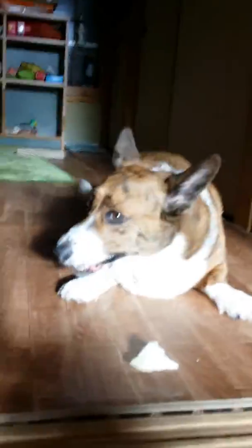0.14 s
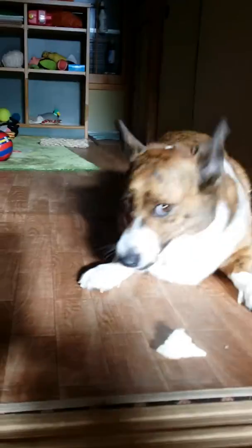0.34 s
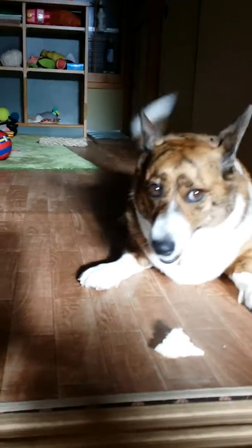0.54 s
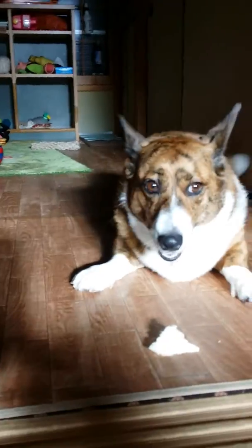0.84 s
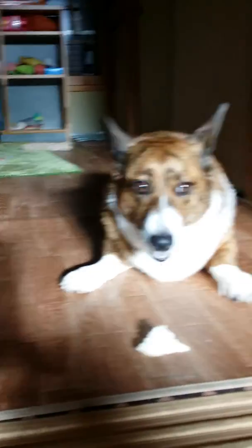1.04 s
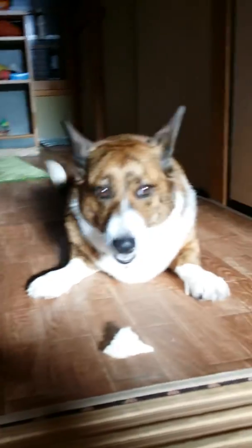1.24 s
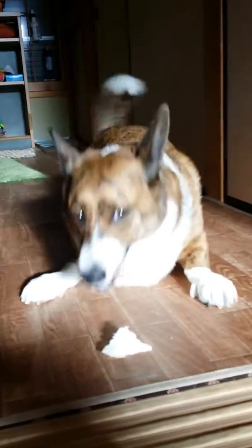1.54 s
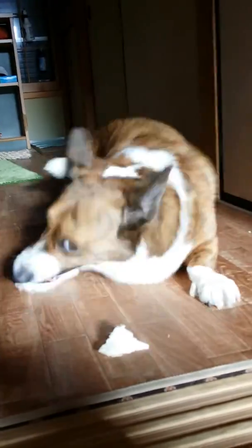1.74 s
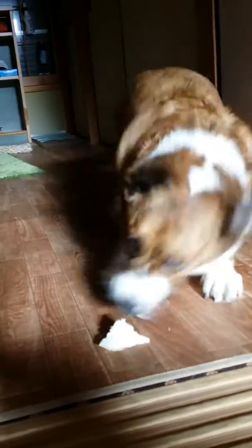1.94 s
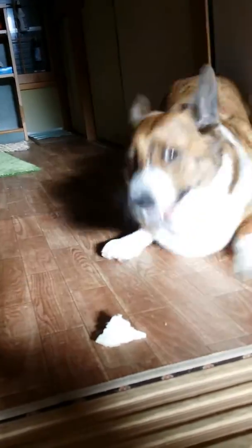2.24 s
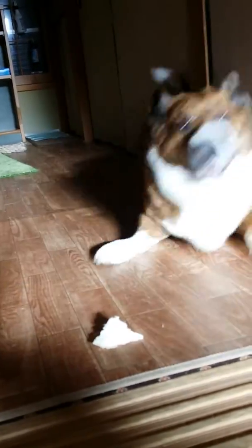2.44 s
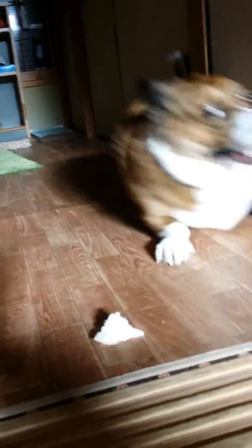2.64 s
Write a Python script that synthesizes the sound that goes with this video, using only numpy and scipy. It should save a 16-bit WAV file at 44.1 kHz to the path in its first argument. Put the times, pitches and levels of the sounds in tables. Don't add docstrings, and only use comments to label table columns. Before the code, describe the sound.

A dog gives two rough, throaty growls with pauses between, then a longer growl breaking into gulp, grunt and snarl; claws tick and paws thump on wooden boards in a small room, close phone microphone.

```python
import sys
import numpy as np
from scipy import signal
from scipy.fft import rfft, irfft, next_fast_len
from scipy.io import wavfile
from scipy.ndimage import uniform_filter1d, map_coordinates

SR = 44100
rng = np.random.default_rng(int(sys.argv[2]) if len(sys.argv) > 2 else 0)


def to_wav(s):
    ch = np.atleast_2d(s).T
    pcm = np.round(np.clip(ch, -1, 1) * 32767)
    wavfile.write(sys.argv[1], SR, pcm.astype(np.int16))


def gain_from_db(level_db):
    decades = np.asarray(level_db, float) / 20
    return 10 ** decades


N = 123479


def unit(x):
    return x / np.sqrt(np.mean(x ** 2) + 1e-20)


def along(points, hz):
    f, value = np.transpose(points)
    return np.interp(np.log(hz + 1), np.log(f + 1), value)


def wobble(rate, size):
    knots = rng.standard_normal(int(size * rate / SR) + 4)
    return map_coordinates(knots, [np.arange(size) * rate / SR])


def filtered(x, response):
    m = next_fast_len(x.shape[-1] + SR // 2)
    spectrum = rfft(x, m) * response(np.fft.rfftfreq(m, 1 / SR))
    return irfft(spectrum, m)[..., :x.shape[-1]]


def ringing(peaks):
    def response(f):
        total = 0
        for k, (centre, width, db) in enumerate(peaks):
            damping = 1j * f * width
            total = total + (-1) ** k * gain_from_db(db) * damping / (centre ** 2 - f ** 2 + damping)
        return total
    return response


def low_cut(hz, order):
    b, a = signal.butter(order, hz, "high", analog=True)
    return lambda f: signal.freqs(b, a, f)[1]


TRACT_WIDTH_HZ, TRACT_WIDENS = 130, 0.042


def gliding(x, tract, count=7):
    place, out = np.linspace(0, count - 1, len(x)), 0
    for k in range(count):
        peaks = []
        for *hz, db_start, db_end in tract:
            centre = np.interp(k, [0, (count - 1) / 2, count - 1], hz)
            width = TRACT_WIDTH_HZ + TRACT_WIDENS * hz[0]
            peaks.append((centre, width, db_start + (db_end - db_start) * k / (count - 1)))
        shaped = filtered(x, lambda f: ringing(peaks)(f) / (1 + 1j * f / 6000) ** 2)
        out = out + np.clip(1 - abs(place - k), 0, 1) * shaped
    return unit(out)


# frequency in Hz, width in Hz, level in dB.
CHEST_MODES = [(95, 10, -11), (144.5, 77, 7), (326, 68, -4.5)]
# frequency in Hz, width in Hz, level in dB.
TEETH_MODES = [(5950, 2800, 19), (11460, 4700, 16.5)]
CHEST_DB, MOUTH_DB, BREATH_DB = 0.5, 0, 3.5
SOFT_HZ, SLOWEST_HZ, DRIFT = 900, 80, 0.06
SIZE_DB, FLUTTER_DB, RATTLE_DB = 2.2, 1.8, 1.5
PUFF_S, PUFF_FLOOR = 0.002, 0.25
TURBULENT, SNAP = 0.9, 0.22


def growl(rows, tract, scatter, rate_hz, sag_hz, mouth_hz, width_hz, hiss_db):
    s, *cols = np.transpose(rows)
    start = round(s[0] * SR)
    t = np.arange(start, min(N, round(s[-1] * SR))) / SR
    effort, opening, breath = [np.interp(t, s, c) for c in cols]

    rate = np.maximum(SLOWEST_HZ, rate_hz + sag_hz * (effort - effort.max()))
    rate = rate * (1 + DRIFT * wobble(30, len(t)))
    timing, size = np.clip(rng.standard_normal((80, 2)), -1.7, 1.7).T
    cycles = np.arange(80) + 0.5 + scatter * timing
    at = np.interp(cycles, np.cumsum(rate) / SR, np.arange(len(t)), right=len(t)).astype(int)
    slaps = np.bincount(at, gain_from_db(SIZE_DB * size), len(t) + 1)[:len(t)]
    folds = unit(slaps - slaps.mean())
    gate = unit(filtered(slaps, lambda f: 1 / (1 + 2j * np.pi * f * PUFF_S))) + PUFF_FLOOR
    puffs = unit(gate * rng.standard_normal(len(t)))

    def soft(f):
        return 1 / (1 + 1j * f / SOFT_HZ)

    def cavity(f):
        return ringing([(mouth_hz, width_hz, 0)])(f) * ringing([(mouth_hz, 700, 0)])(f)

    def teeth(f):
        return ringing(TEETH_MODES[:1])(f) ** 2 + ringing(TEETH_MODES[1:])(f) ** 2

    chest = unit(filtered(folds + scatter * puffs, lambda f: -ringing(CHEST_MODES)(f) * soft(f) ** 2))
    mouth = unit(filtered(folds + TURBULENT * puffs, lambda f: cavity(f) * soft(f)))
    upper = gain_from_db(RATTLE_DB * wobble(51.7, len(t))) * gliding(puffs + SNAP * folds, tract)
    hiss = gain_from_db(hiss_db) * unit(filtered((gate + 3) * rng.standard_normal(len(t)), teeth))

    mouth_level_db = opening + MOUTH_DB + FLUTTER_DB * wobble(49.7, len(t))
    mix = gain_from_db(CHEST_DB) * chest - gain_from_db(mouth_level_db) * mouth
    mix = mix + gain_from_db(breath + BREATH_DB) * (upper + hiss)
    to_end = t[-1] - t
    if t[-1] > 2.79:
        to_end = to_end + 1
    fade = np.minimum(1, np.minimum(t - t[0], to_end) / 0.003)
    out = np.zeros(N)
    out[start:][:len(t)] = gain_from_db(effort) * mix * fade
    return out


# time in seconds, effort in dB, mouth opening in dB, breath in dB.
FIRST_GROWL = [(.172, -56.5, -17, -8), (0.187, -35.5, -10, -11), (.2, -25.5, -1.5, -18),
               (0.236, -18.5, 3.5, -13.5), (.295, -18.5, 1, -15.5), (0.335, -22, -1, -11.5),
               (.36, -29, -6.5, -5), (0.399, -37, -3.5, -7), (0.522, -65.5, 0, -4)]
SECOND_GROWL = [(1.196, -53.5, -6, -3), (1.215, -34.5, -16, -8.5), (1.23, -31, 2, -10),
                (1.236, -22, -9, -17.5), (1.259, -25.5, -7.5, -8.5), (1.299, -26, -6.5, -5.5),
                (1.361, -27.5, -13, -5), (1.389, -40, -14, -2.5), (1.438, -50.5, -20, -5.5)]
LONG_GROWL = [(1.5993, -25, 4.5, -10.5), (1.635, -23, -2.5, -12), (1.65, -19, -2, -12), (1.7, -18, 0, -7.5),
              (1.742, -20, -1.5, -16), (1.766, -18.5, 3, -10.5), (1.82, -22, -5, -11.5),
              (1.884, -25.5, -8.5, -5.5), (1.915, -42.5, -9.5, -15)]
GULP_GROWL = [(1.915, -42, -12, -6), (1.929, -33, 5.5, -4.5), (1.945, -37, -15, -16), (1.965, -51, -8, -13)]
GRUNT_GROWL = [(2.048, -45.5, -19, -3), (2.072, -24, -12, -14.5), (2.094, -26, -17, -17),
               (2.11, -37.5, -7.5, -7.5), (2.2, -55, 1.5, 2.5)]
SNARL_GROWL = [(2.35, -48, -31, -8), (2.366, -31, -7.5, -6.5), (2.395, -21, 0.5, -13.5),
               (2.412, -22, -4, -6.5), (2.432, -21.5, -27, -3.5), (2.488, -25.5, -12, -3),
               (2.531, -33, -19, -6.5), (2.591, -41, -24.5, -19)]
LAST_GROWL = [(2.779, -45.5, 12, -33), (2.791, -30, -22.5, -9), (2.8, -29, -18, -8)]
# fold rate in Hz at full effort, sag in Hz per dB, mouth resonance in Hz,
# mouth width in Hz, hiss in dB.
GROWL_VOICES = [
    (152.3, 1.5, 649, 284, -8.5),
    (125.1, 1, 644, 220, -10),
    (147.9, 7, 685, 260, -15),
    (110.1, 1.45, 730, 520, -11.5),
    (148.6, 1, 670, 133, -8.5),
    (148.3, 1.31, 850, 1800, -8),
    (159.8, 1.4, 1300, 400, -8.5),
]
# frequency in Hz at start,
# middle and end, level in dB at start and end.
GROWL_TRACTS = [
    [(996, 1080, 1700, 1, 0), (2060, 1800, 1410, -0.5, 0), (2250, 2250, 2000, 2, -0.5),
     (3056, 3050, 3170, -7.5, -2), (4180, 4100, 3960, -6.5, -10)],
    [(960, 1163, 1540, 15, 6), (2300, 2500, 2350, 5, 11.5), (3250, 3360, 2870, 8, 12),
     (4430, 4530, 3600, 10.5, 2)],
    [(1250, 1090, 1300, -1, 6.9), (2220, 2260, 2650, 6, 8.9), (2860, 2960, 3580, -4, 3.3),
     (3750, 3400, 4140, -19, 2)],
    [(1300, 1270, 1280, 0, -3), (1880, 2000, 1900, 5, -5), (3300, 3400, 3500, -4, -5)],
    [(1110, 1120, 1150, 6.5, 0.82), (1540, 1580, 1780, 11, 6.3), (2330, 1950, 1860, 10.5, 3.6),
     (2880, 3140, 4200, 6, 7.3)],
    [(920, 1110, 1300, 9, -11.5), (2060, 1694, 1900, 4, 10), (2430, 2490, 3600, 15.5, -1),
     (3350, 3500, 3500, 6, 1.5), (4400, 4480, 4900, 10, 4)],
    [(1530, 2100, 1500, 5, 5.5), (4170, 3100, 5200, -4, -7.5)],
]
FOLD_SCATTER = [.24, .25, .15, .2, .04, .25, .1]


def growls():
    efforts = [FIRST_GROWL, SECOND_GROWL, LONG_GROWL, GULP_GROWL, GRUNT_GROWL, SNARL_GROWL, LAST_GROWL]
    out = np.zeros(N)
    for rows, tract, scatter, voice in zip(efforts, GROWL_TRACTS, FOLD_SCATTER, GROWL_VOICES):
        out += growl(rows, tract, scatter, *voice)
    return out


# start in seconds, peak in dB, scrape in seconds.
CLAW_STROKES = [
    (0.7775, -46.5, 0.036),
    (1.9674, -15, 0.0063),
    (1.9731, -35, 0.012),
    (2.0817, -24.5, 0.025),
    (2.2912, -32.5, 0.0046),
    (2.603, -12, 0.0049),
    (2.6351, -22, 0.0087),
    (2.7106, -34, 0.013),
    (2.7887, -23, 0.012),
]
# frequency in Hz, width in Hz, level in dB.
BOARD_MODES = [(393, 200, 5), (957, 226, 5), (1770, 1050, -1.5), (3770, 990, -1), (6450, 1800, -9.5)]
CLAW_DB = -2


def claws():
    drive, t = np.zeros(N + SR), np.arange(SR // 10) / SR
    for s, db, scrape_s in CLAW_STROKES:
        grit = rng.standard_normal(len(t)) * gain_from_db(3.9 * rng.standard_normal(len(t)))
        drive[round(s * SR):][:len(t)] += gain_from_db(db + CLAW_DB) * grit * np.exp(-t / scrape_s)
    return filtered(drive[:N], ringing(BOARD_MODES))


# start in seconds, level in dB, floor resonance in Hz.
PAW_STEPS = [
    (1.0, -48, 144.6),
    (1.069, -42.5, 95),
    (1.984, -21.5, 77),
    (2.49, -24, 65),
    (2.532, -23.5, 59),
    (2.597, -30, 80),
    (2.671, -44, 68),
]
PAW_T60_S, PAW_RISE_S = 0.16, 0.0028


def paws():
    out, t = np.zeros(N + SR), np.arange(SR // 4) / SR
    for s, db, hz in PAW_STEPS:
        push = 1 - np.exp(-t / PAW_RISE_S)
        ring = gain_from_db(db - 60 * t / PAW_T60_S) * np.sin(2 * np.pi * hz * t)
        out[round(s * SR):][:len(t)] += 2 * push * ring
    return out[:N]


# frequency in Hz, left-right likeness.
PORT_LIKENESS = [(130, 1), (290, 0.65), (640, 0.53), (1400, 0.049)]


def rush(spectrum, patchy_db):
    z = signal.stft(rng.standard_normal((2, N)), nperseg=512)[2]
    field = uniform_filter1d(uniform_filter1d(rng.standard_normal(z.shape[1:]), 8, 0), 5, 1)
    pair = signal.istft(z * gain_from_db(patchy_db * unit(field)), nperseg=512)[1][:, :N]

    def shape(hz):
        turn = np.arccos(np.clip(along(PORT_LIKENESS, hz), -1, 1)) / 2
        return gain_from_db(along(spectrum, hz)) * np.array([np.cos(turn), np.sin(turn)])

    mid, side = filtered(pair, shape)
    return unit(np.array([mid + side, mid - side]))


# time in seconds, shuffling level in dB.
MOVEMENT = [(0.7, -97.5), (1.201, -58), (1.39, -48), (1.62, -50.5), (1.76, -38), (2.0, -42.5),
            (2.04, -49.5), (2.19, -42.5), (2.26, -47.5), (2.5, -44.5), (2.63, -39), (2.8, -49)]
# frequency in Hz, density in dB per Hz.
FUR_SPECTRUM = [(24, -38), (40, -2.5), (177, -2), (490, -13.5), (888, -11.5), (4790, -24), (6950, -28),
                (13900, -29.5), (15000, -47.5)]
FUR_DB = 5


def shuffle():
    s, db = np.transpose(MOVEMENT)
    level_db = np.interp(np.arange(N) / SR, s, db, left=-120) + FUR_DB + 0.86 * wobble(25.21, N)
    return gain_from_db(level_db) * rush(FUR_SPECTRUM, patchy_db=3.5)


# frequency in Hz, reverberation time in seconds.
ROOM_DECAY = [(150, 0.102), (1000, 0.17), (8000, 0.12)]
# frequency in Hz, level in dB.
ROOM_COLOUR = [(150, -12), (700, -4), (2000, 3), (6000, -8)]


def room(x):
    hz, t, z = signal.stft(rng.standard_normal((2, SR // 2)), SR, nperseg=256)
    decay = gain_from_db(-60 * t / along(ROOM_DECAY, hz)[:, None])
    tail = signal.istft(z * decay, SR, nperseg=256)[1]
    delayed = np.pad(x, (60, 0))[None]
    wet = signal.fftconvolve(delayed, tail / np.linalg.norm(tail[0]), axes=1)[:, :N]
    return filtered(wet, lambda f: gain_from_db(along(ROOM_COLOUR, f)))


# frequency in Hz, density in dB per Hz.
AIR_SPECTRUM = [(18, -59.5), (30, 6.5), (156, 3.5), (420, -4), (467, -1), (2910, -21), (7460, -23.5),
                (14000, -10.5), (15500, -67.5)]
AIR_DB = -55


def air():
    return gain_from_db(AIR_DB + 0.53 * wobble(6.17, N)) * rush(AIR_SPECTRUM, patchy_db=1.5)


def scene():
    dog = growls() + claws() + paws()
    return dog + room(dog) + shuffle() + air()


# frequency in Hz, level in dB.
COVERED_PORT = [(200, 1.5), (700, 0), (1300, -0.5), (2400, -10.5), (4400, -16.5), (7000, -26), (9500, -13),
                (15000, -3)]
PORT_HZ, PORT_WIDTH_HZ, PORT_DB = 7100, 1500, 5
HISS_DB, RIGHT_LAG_S = -58.5, 0.00018


def ports(dry):
    port = ringing([(PORT_HZ, PORT_WIDTH_HZ, PORT_DB)])
    hiss = gain_from_db(HISS_DB) * unit(filtered(rng.standard_normal(N), lambda f: port(f) ** 2))
    left = filtered(dry[0], lambda f: 1 + port(f)) + hiss
    lag = lambda f: np.exp(-2j * np.pi * f * RIGHT_LAG_S)
    right = filtered(dry[1], lambda f: gain_from_db(along(COVERED_PORT, f)) * lag(f))
    return np.array([left, right])


# frequency in Hz, level in dB.
PORT_TREBLE = [(7500, -1.5), (9000, 2), (12000, -5), (14400, -3.5), (14900, -38)]
POP_S, POP_DB, POP_SOFT_HZ = 1.5397, 2.5, 2700
LOW_CUT_HZ, SUB_CUT_HZ = 57, 71


def phone_response(f):
    return low_cut(SUB_CUT_HZ, order=2)(f) * gain_from_db(along(PORT_TREBLE, f))


def finger_pop():
    kick = gain_from_db(POP_DB) * (np.arange(N) == round(POP_S * SR))

    def step(f):
        return SR / (2j * np.pi * f + 1e-3) / (1 + 1j * f / POP_SOFT_HZ) * (1 + 1j * f / 9000)

    return filtered(kick, lambda f: step(f) * phone_response(f) * low_cut(LOW_CUT_HZ, order=4)(f))


UNDER_WHOLE_DB, UNDER_HISS_DB = 47, 17
GAP_SCATTER_DB, GAPS_FROM_HZ = 5, 8300


def thinned_highs(x, size=12):
    hz, _, z = signal.stft(x, SR, "cosine", nperseg=2048)
    band = np.arange(len(hz)) // size
    power = np.add.reduceat(abs(z) ** 2, np.arange(0, len(hz), size), axis=1)
    whole = power.sum(axis=1, keepdims=True)
    hissing = power[:, hz[::size] > GAPS_FROM_HZ / 2].max(axis=1, keepdims=True)
    luck = uniform_filter1d(rng.standard_normal(power.shape), size=3, axis=2)
    luck_db = GAP_SCATTER_DB * unit(luck)
    limit = np.maximum(whole * gain_from_db(-2 * UNDER_WHOLE_DB), hissing * gain_from_db(-2 * UNDER_HISS_DB)) * gain_from_db(2 * luck_db)
    keep = (power > limit)[:, band] | (hz < GAPS_FROM_HZ)[:, None]
    return signal.istft(z * keep, SR, "cosine", nperseg=2048)[1][:, :N]


def low_pass(x):
    return signal.sosfilt(signal.butter(12, 15740, fs=SR, output="sos"), x)


CEILING, KNEE = 0.72, 3


def record(dry):
    pair = ports(dry)
    pair = pair / (1 + abs(pair / CEILING) ** KNEE) ** (1 / KNEE)
    mix = thinned_highs(filtered(pair, phone_response))
    mix[0] += finger_pop()
    return low_pass(mix)


dry = scene()
out = record(dry)
to_wav(out)
```